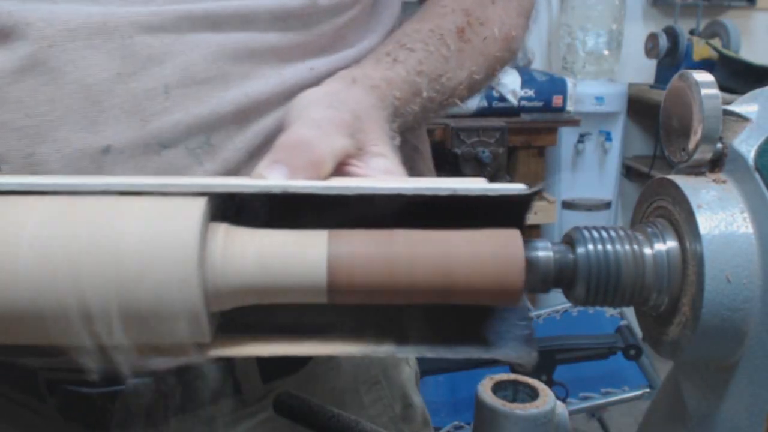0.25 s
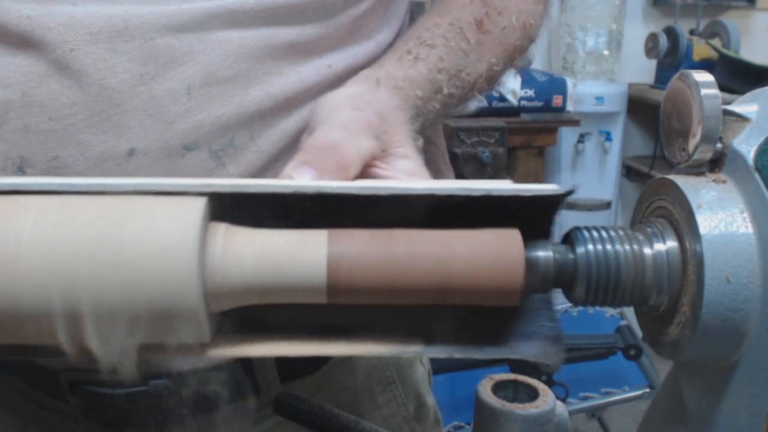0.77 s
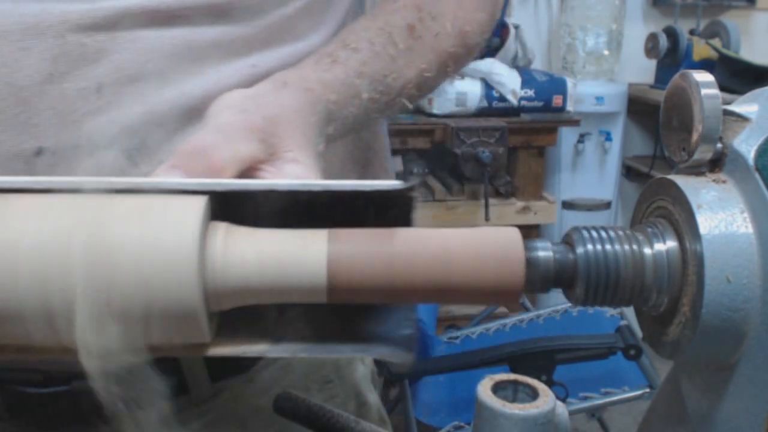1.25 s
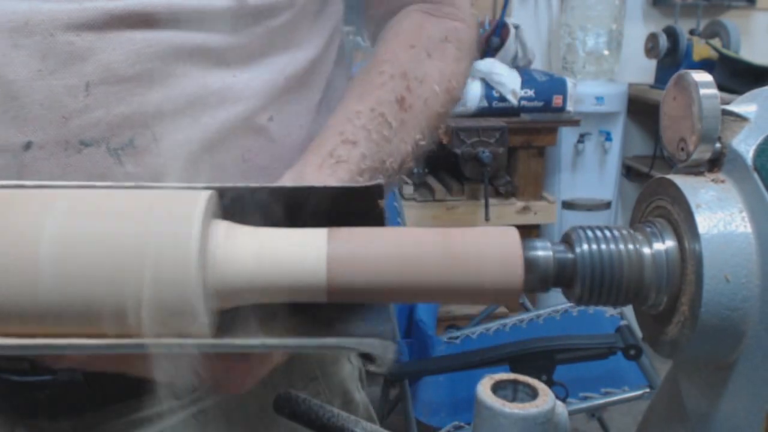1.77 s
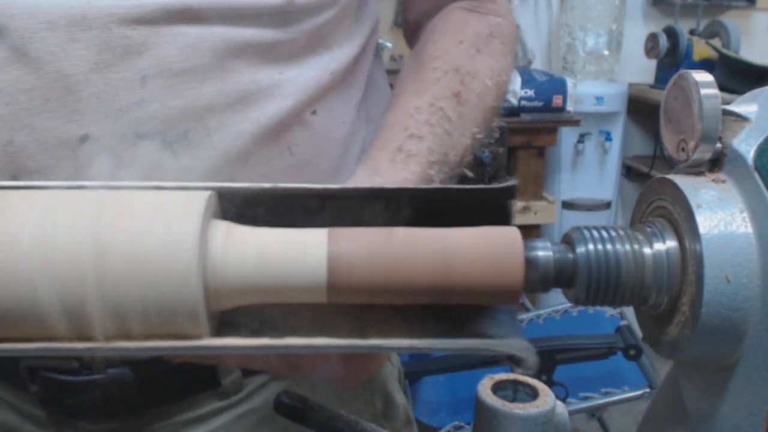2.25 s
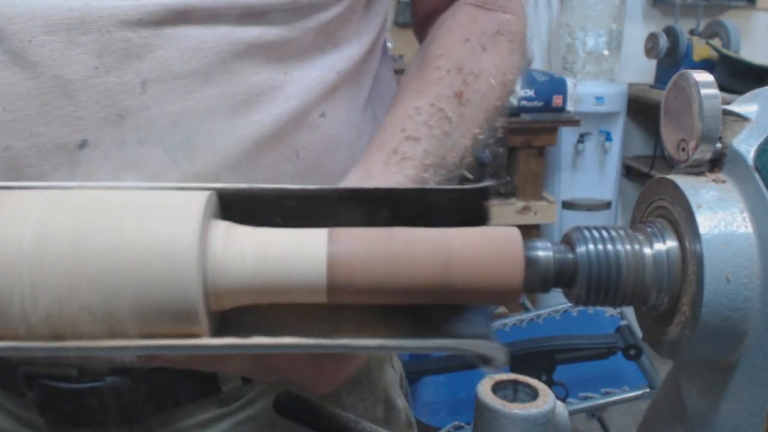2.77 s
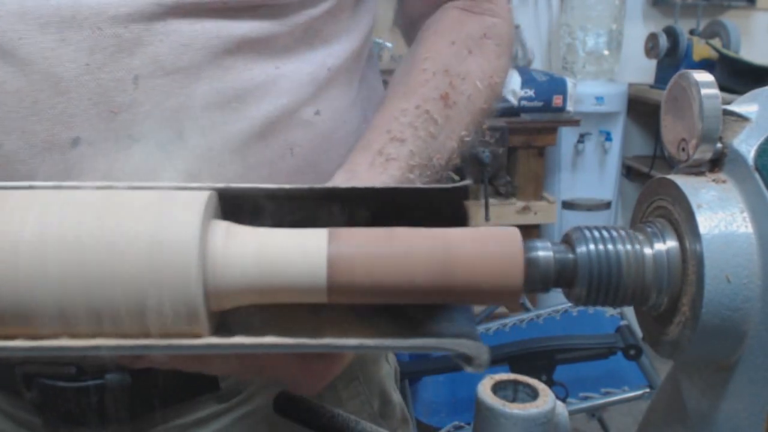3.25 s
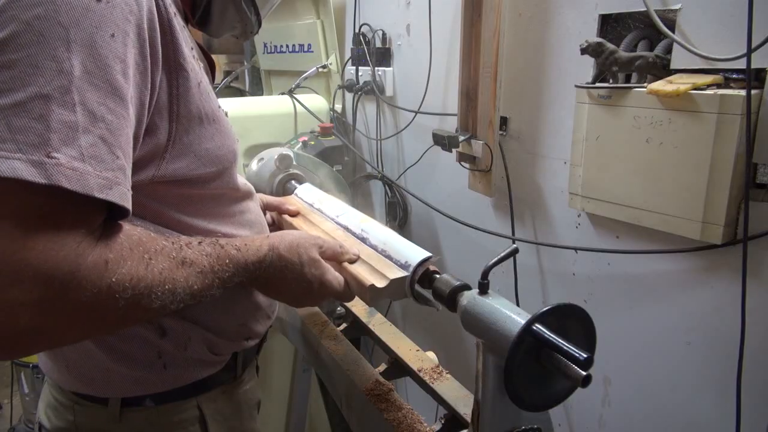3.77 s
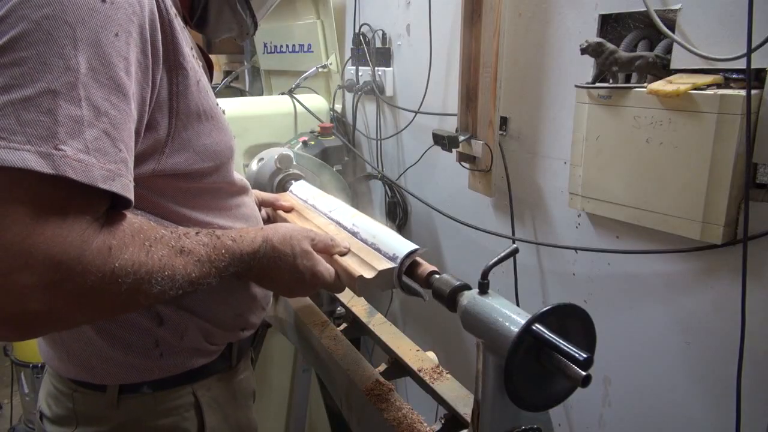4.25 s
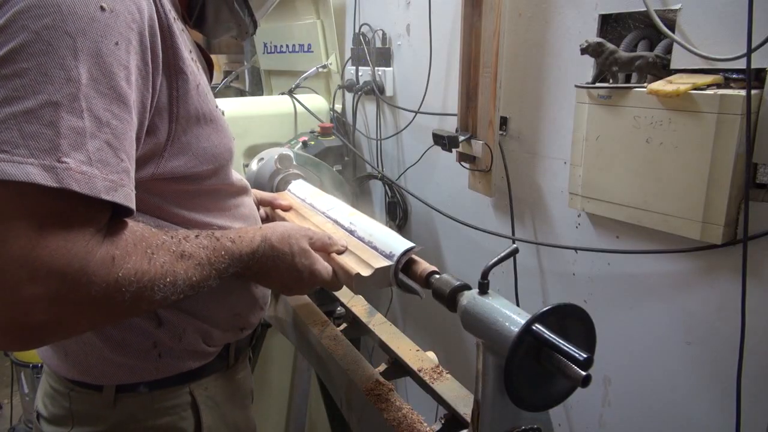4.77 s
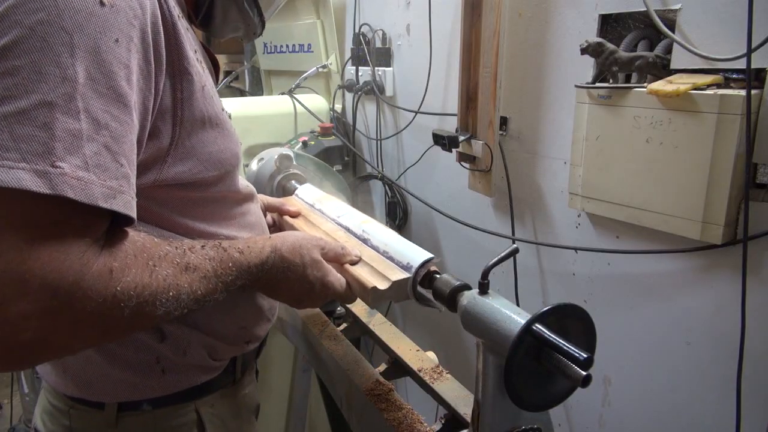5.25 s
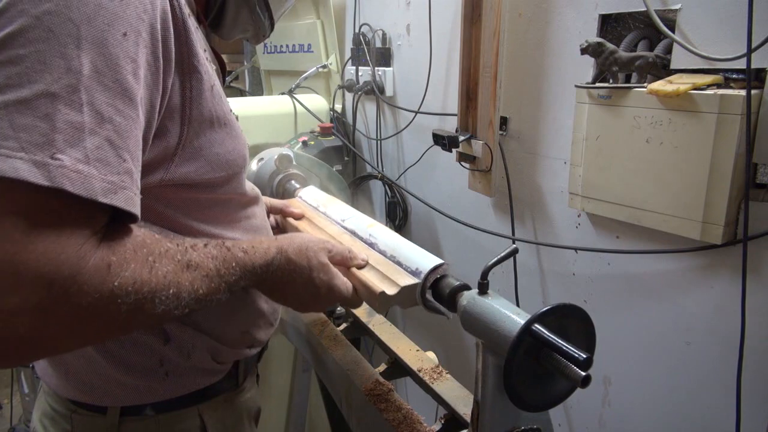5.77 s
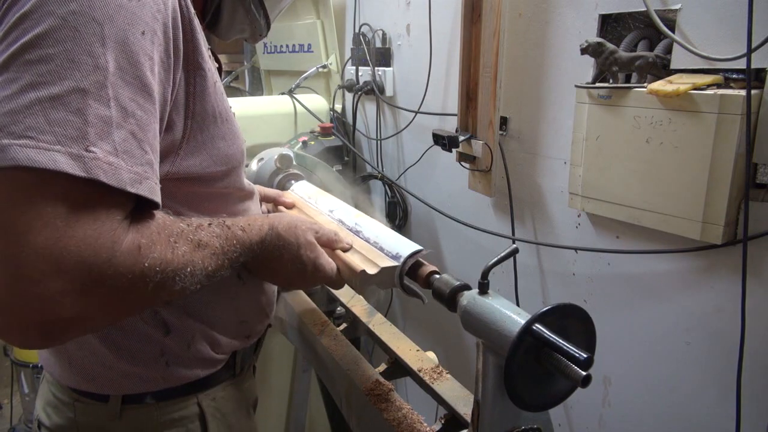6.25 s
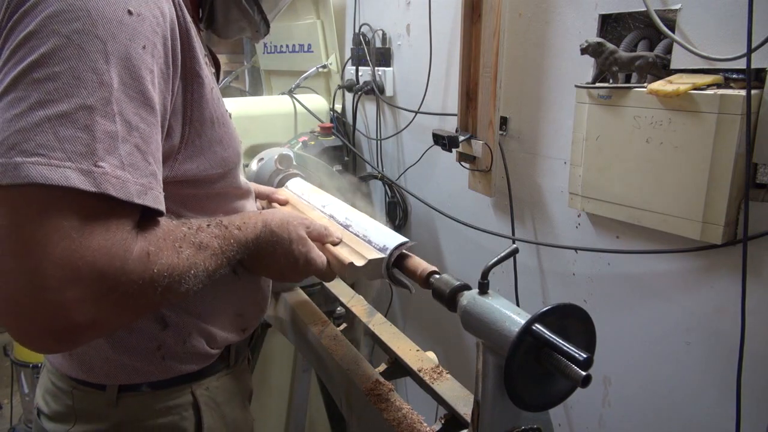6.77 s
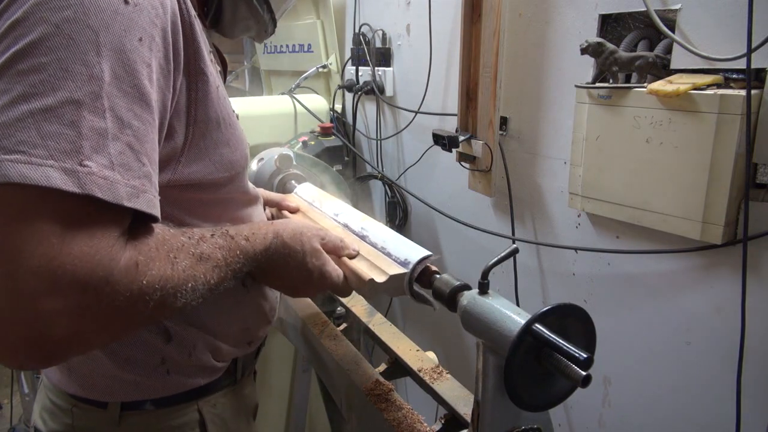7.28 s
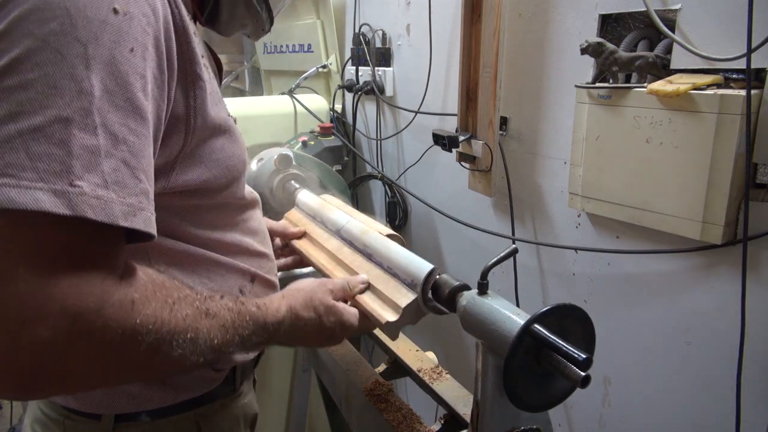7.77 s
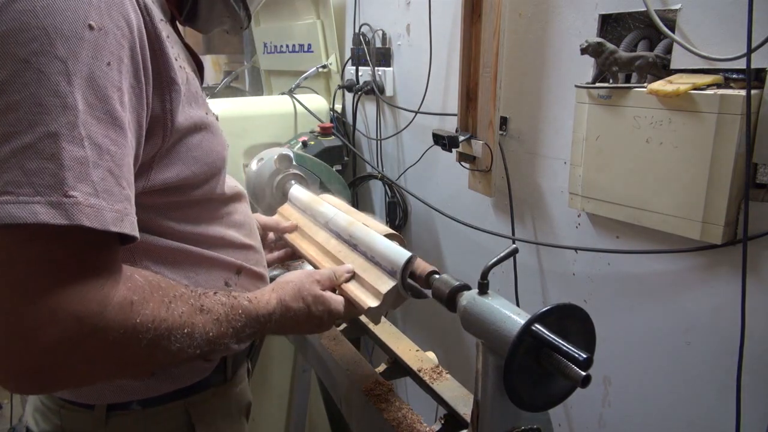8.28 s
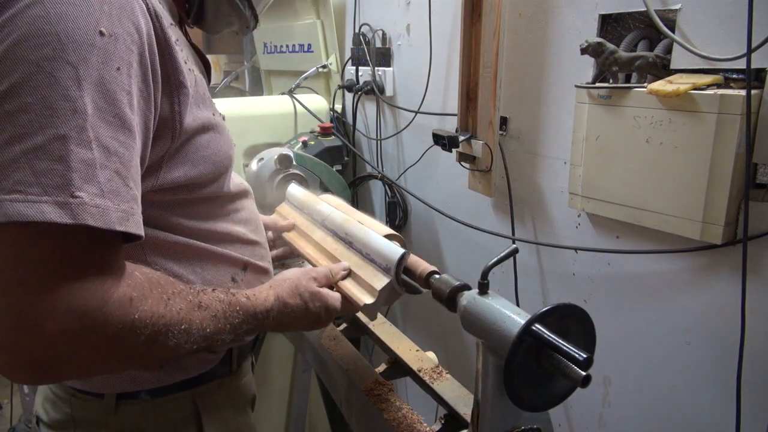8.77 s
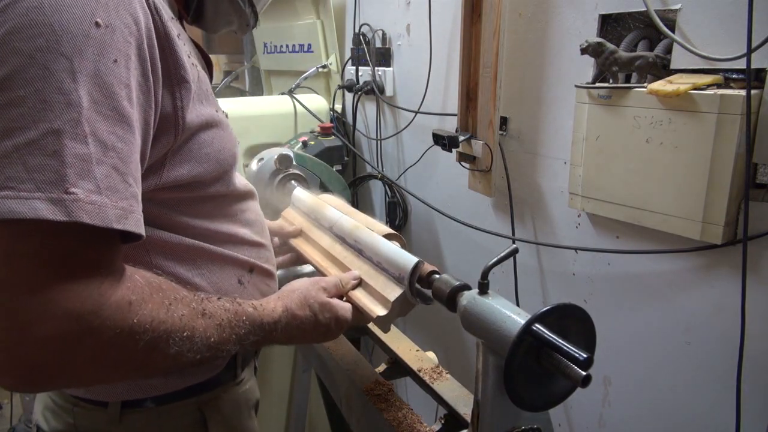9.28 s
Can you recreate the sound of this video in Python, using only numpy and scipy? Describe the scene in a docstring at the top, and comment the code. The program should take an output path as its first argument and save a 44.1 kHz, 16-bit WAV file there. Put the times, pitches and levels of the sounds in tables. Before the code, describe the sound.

Abrasive strip held against a spinning wooden cylinder on a lathe, a steady bright sanding hiss fluttering rapidly over a very faint motor hum.

```python
"""Sanding wood on a lathe

A strip of abrasive is held against a wooden cylinder spinning on a lathe, in a small workshop.
Random grit noise makes the hiss; it pulses as high spots pass under the strip, 13 to 14 turns a second.
The hand changes the force and tone, and short narrow rings stand out of the hiss.
Underneath are a faint motor hum, a low rumble and a late shudder. A pass of about six seconds loops."""
import sys
import numpy as np
from scipy import signal
from scipy.fft import rfft, irfft, next_fast_len
from scipy.io import wavfile
from scipy.ndimage import uniform_filter1d, map_coordinates

SR = 44100
rng = np.random.default_rng(int(sys.argv[2]) if len(sys.argv) > 2 else 0)


def log_audio(samples):
    """Write samples as a 16-bit WAV file to the path given in sys.argv[1]."""
    # one column per channel
    frames = np.atleast_2d(samples).T
    # limit to full scale, then quantise
    limited = np.clip(frames, -1, 1)
    pcm = np.round(limited * 32767).astype(np.int16)
    wavfile.write(sys.argv[1], SR, pcm)


N = 419832  # samples in the whole sound
PASS_S = 6.08  # length of one pass, s
TOP_HZ = 9630  # nothing is kept from this frequency up
FRAMES = dict(nperseg=2048, noverlap=1536)  # short overlapping slices, in samples


def amp(db):
    """Turn decibels into gain."""
    return 10 ** (np.asarray(db) / 20)


def unit(x):
    """Scale x to an rms of 1."""
    return x / np.sqrt(np.mean(x ** 2) + 1e-20)


def along(points, hz):
    """Join (f/Hz, value) points by straight lines on a log frequency axis."""
    f, v = np.transpose(points)
    return np.interp(np.log(hz + 1), np.log(f + 1), v)


def curves(rows, t):
    """Read each column after the time at the times t."""
    s, *cols = np.transpose(rows)
    return [np.interp(t, s, c) for c in cols]


def wobble(rate):
    """Make a smooth random curve through `rate` random points a second."""
    points = rng.standard_normal(int(N * rate / SR) + 4)
    return map_coordinates(points, [np.arange(N) * rate / SR])


def bell(offset, width):
    """Make a smooth hump of height 1, `width` wide at half its height."""
    return np.exp(-np.log(2) * (2 * offset / width) ** 2)


def filtered(x, response):
    """Multiply the spectrum of x by a response to frequency."""
    m = next_fast_len(N + SR // 2)
    hz = np.fft.rfftfreq(m, 1 / SR)
    return irfft(rfft(x, m) * response(hz), m)[:N]


# The hand over one pass: t/s, force level/dB, body of the wood level/dB, keen edge of the strip level/dB
HAND_PASS = [(0.0, 0.8, -0.4, -1), (0.72, -1.1, -3, 2.5), (0.92, -1.0, -1.2, 0.9), (1.01, 1.1, -1.5, -1),
             (1.26, -0.8, 0.5, 0.6), (1.48, 0.6, 1.4, -1.5), (1.65, -0.5, 2, 0.8), (2.21, 0.6, 1.1, 0.8),
             (2.66, -1.54, 1, 2), (3.12, 0.4, 1.5, -1), (3.56, -0.7, 1.5, 0.5), (3.68, 0.9, -1.0, -1.1),
             (4.56, -1.2, -1.8, 1), (4.91, 0.2, -0.5, -0.8), (5.13, -0.5, -0.3, -1),
             (5.25, 1.6, -2.2, -2.5), (5.55, 0.4, 0.4, -1.7), (6.08, 1.0, 0.1, -1.1)]


def hand(t):
    """Force of the hand, body of the wood and edge of the strip, in dB about their usual levels."""
    return curves(HAND_PASS, t)


# Balance of the bearing and belt rumble: f/Hz, relative level/dB per Hz
RUMBLE_SPECTRUM = [(20, -18), (42, -13.5), (58, -3), (78, 2), (92, -6), (112, 3.5), (135, -6.5),
                   (190, -8.5), (350, -2.5), (800, -25.5)]


def rumble(load_db):
    """Bearings and belt: low shaped noise that grows faster than the load."""
    noise = rng.standard_normal(N)
    steady = unit(filtered(noise, lambda hz: amp(along(RUMBLE_SPECTRUM, hz))))
    return amp(-62 + 1.3 * load_db) * steady


# Motor and drive tones: f/Hz, rms level/dB before load and wobble, unsteadiness/dB (also sways the phase)
MOTOR_TONES = [(53.3, -79, 5), (69, -82, 3), (75.4, -80.5, 2), (150.3, -71.5, 0.8), (207, -74.5, 0),
               (252, -89.5, -0.5), (298, -75.5, 2.5)]


def motor_hum(t, load_db):
    """Motor and drive: wavering sine tones that grow with the load."""
    hum = 0
    for hz, db, unsteady_db in MOTOR_TONES:
        level = amp(db + unsteady_db * wobble(6.1))
        sway = .3 * unsteady_db * wobble(5)  # radians
        hum = hum + level * np.sin(2 * np.pi * hz * t + sway)
    return np.sqrt(2) * amp(.6 * load_db) * hum  # 0.6 dB more per dB of load


# Shudder of the frame while the spindle labours: t/s, rms level/dB
FRAME_SHUDDER = [(4.9, -95), (5.25, -74), (5.9, -68), (6.08, -76)]


def frame_shudder(t, turns):
    """The lathe's frame shakes as a sine wave, four swings per turn of the wood."""
    swings = np.sin(2 * np.pi * 4 * turns)
    return np.sqrt(2) * amp(curves(FRAME_SHUDDER, t)[0]) * swings


def lathe(t, turns):
    """Hum and rumble follow the load, taken as force plus body; the shudder has its own level."""
    force_db, body_db, _ = hand(t)
    load_db = force_db + body_db
    return motor_hum(t, load_db) + frame_shudder(t, turns) + rumble(load_db)


# High spots of the wood: place in the turn (0-1), spread in turns, level/dB before random variation
WOOD_HIGH_SPOTS = [(.72, 0.082, 2), (0.39, 0.08, 1.45), (0.14, .07, 1.0)]


def contact_db(turns, uneven_db, fast_wobble_db, slow_wobble_db):
    """High spots press the strip once a turn, unevenly; slow and fast random level wobbles run throughout."""
    lift = 0
    for place, spread, db in WOOD_HIGH_SPOTS:
        offset = (turns - place + .5) % 1 - .5
        press = np.exp(-.5 * (offset / spread) ** 2)
        lift = lift + db * amp(uneven_db * wobble(8.3)) * press
    return lift - lift.mean() + fast_wobble_db * wobble(45) + slow_wobble_db * wobble(14)


def grit(per_second, coarse_db):
    """Countless fine grains make a hiss; coarser ones tear fibres as a dense crackle of random clicks."""
    fine = rng.uniform(-0.96, 1, N) * np.sqrt(3)
    hits = rng.random(N) < per_second / SR
    tears = hits * rng.uniform(-1.01, 1, N)
    return unit(fine + amp(coarse_db) * unit(tears))


# Balance of the grit's scrape: f/Hz, relative level/dB per Hz
SCRAPE_SPECTRUM = [(150, -39.5), (440, -29), (750, -22), (1300, -20.5), (1550, -13), (2100, -10.5),
                   (2700, -4.5), (3700, -4), (4300, -0.74), (5900, -0.9), (6950, 0.1), (7450, -3.5),
                   (8300, -3.5), (9600, -5)]
# Resonances of wood and backing: f/Hz, width/Hz, lift level/dB
WOOD_RESONANCES = [(313, 24, 7), (567, 31, 5), (735, 38, 2.5), (965, 15, 2.5), (1033, 70, 1.5),
                   (1813, 99, 2.5), (2400, 74, -0.5), (2770, 100, 1), (3405, 100, 2.5), (4280, 120, 0.5),
                   (5220, 280, 1.6), (5600, 130, 0.4), (6750, 110, 1.5), (8890, 180, 3.5)]


def scrape_colour(hz):
    """The scrape's broad tone, with the resonances of wood and backing added in dB."""
    resonance_db = sum(db * bell(hz - fc, width) for fc, width, db in WOOD_RESONANCES)
    return amp(along(SCRAPE_SPECTRUM, hz) + resonance_db)


# Brief rings of strip and wood as the grip shifts: t/s, f/Hz, lift level/dB
GRIP_RINGS = [(.08, 4800, 4.5), (.17, 310, 10), (1.7, 2290, 4), (2.05, 1820, 3), (2.08, 5370, 4),
              (2.43, 300, 12), (2.5, 7650, 5), (2.6, 5500, 6.5), (3.74, 3130, 7), (3.75, 4250, 5.5),
              (5.75, 3090, 8.5), (5.85, 1040, 5), (5.95, 750, 4), (5.98, 323, 14)]


def ringing_db(hz, when):
    """Each ring swells and fades in a narrow band; higher ones are wider."""
    lift = 0
    for s, fc, db in GRIP_RINGS:
        width = 160 * np.sqrt(fc / 3000)  # 160 Hz wide at 3000 Hz
        lift = lift + db * np.outer(bell(hz - fc, width), bell(when - s, 0.31))  # 0.31 s long
    return lift


def shifting_db(shape, depth_db):
    """The contact patch wanders, so narrow bands of the hiss come and go."""
    field = rng.standard_normal(shape)
    for _ in range(2):
        field = uniform_filter1d(field, size=4, axis=0)  # blur across frequency
        field = uniform_filter1d(field, size=36, axis=1)  # blur across time
    return depth_db * unit(field)


# How much each pitch follows the hand: f/Hz, share (1 = fully)
BODY_SHARE = [(600, 0.89), (1200, 1.3), (2000, 0.69), (3300, 0.12), (4500, 0)]
EDGE_SHARE = [(5800, 0.02), (8000, 1)]
HISS_DB = -21.6  # rms level of the scrape before the hand, rings and shifting bands act


def sanding(turns):
    """Grit scrapes the turning wood; the hand sets its force and colour."""
    press_db = contact_db(turns, uneven_db=1.8, fast_wobble_db=0.44, slow_wobble_db=0.25)
    pulsing_grit = grit(per_second=4000, coarse_db=-5.5) * amp(press_db)
    scrape = unit(filtered(pulsing_grit, scrape_colour))
    hz, when, z = signal.stft(scrape, SR, **FRAMES)
    force_db, body_db, edge_db = hand(when)
    # a well bedded strip drives the wood's low notes; a light touch leaves the keen top
    gain_db = force_db + np.outer(along(BODY_SHARE, hz), body_db)
    gain_db = gain_db + np.outer(along(EDGE_SHARE, hz), edge_db)
    gain_db = gain_db + ringing_db(hz, when) + shifting_db(z.shape, depth_db=1.16)
    hiss = signal.istft(z * amp(gain_db), SR, **FRAMES)[1][:N]
    return amp(HISS_DB) * hiss


# Spindle speed over one pass: t/s, turns per second
SPINDLE_SPEED = [(0.0, 13.726), (0.8, 13.805), (1.6, 14.11), (2.4, 13.959), (3.1, 14.293), (3.8, 14.34),
                 (4.5, 13.437), (4.9, 13.115), (5.4, 12.865), (5.9, 13.577), (6.08, 13.76)]


def scene():
    """Sanding and lathe, the same in both ears; the pass repeats until the time is filled."""
    t = np.arange(N) / SR
    turns = np.cumsum(curves(SPINDLE_SPEED, t)[0]) / SR  # turns made so far
    sound = sanding(turns) + lathe(t, turns)
    one_pass = sound[:round(PASS_S * SR)]
    looped = np.resize(one_pass, N)
    return np.array([looped, looped])


def record(dry):
    """Cut off everything above the band limit sharply."""
    return np.array([filtered(channel, lambda hz: hz < TOP_HZ) for channel in dry])


dry = scene()
out = record(dry)
log_audio(out)
```